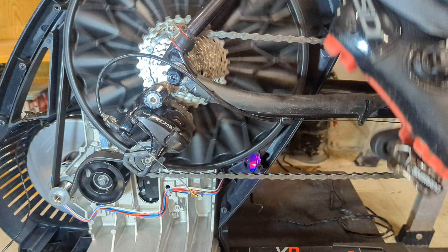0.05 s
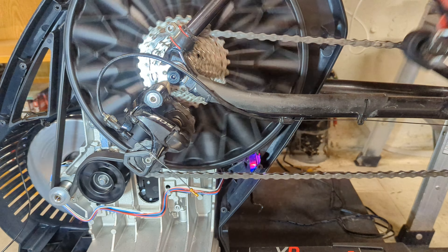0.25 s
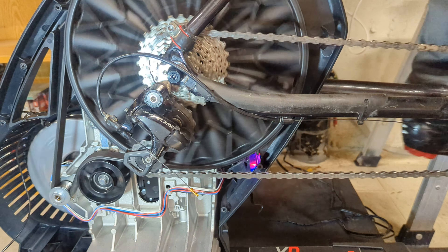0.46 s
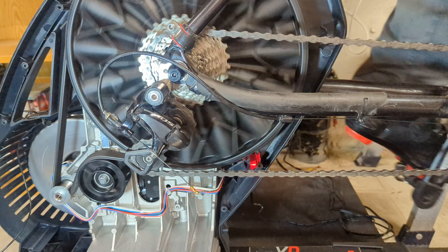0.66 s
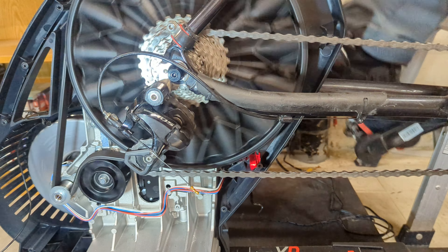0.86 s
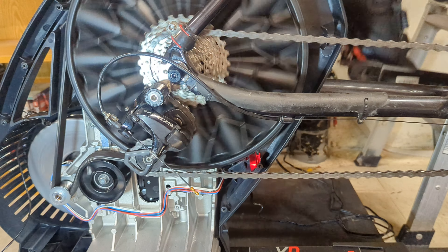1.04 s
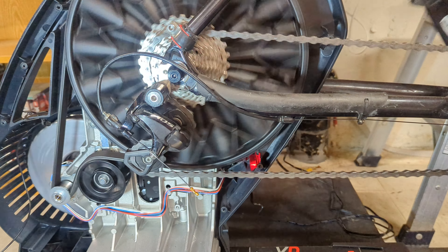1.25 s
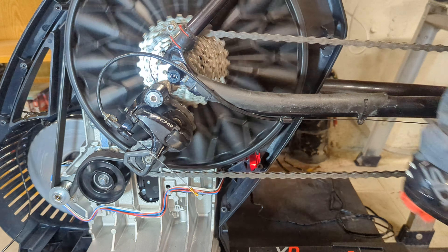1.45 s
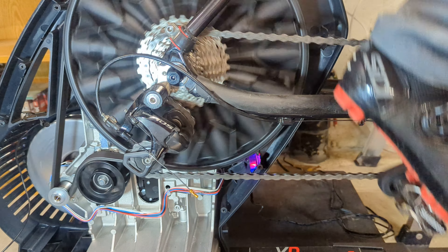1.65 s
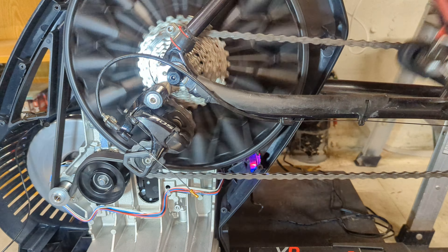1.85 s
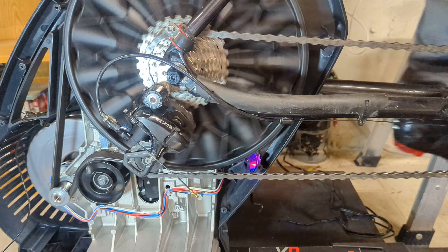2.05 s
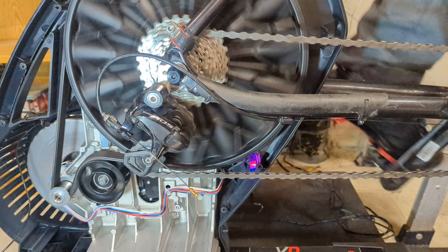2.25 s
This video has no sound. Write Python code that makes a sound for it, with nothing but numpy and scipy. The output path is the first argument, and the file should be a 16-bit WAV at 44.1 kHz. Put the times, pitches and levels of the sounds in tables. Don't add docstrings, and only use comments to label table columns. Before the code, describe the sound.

Direct-drive bike trainer running steadily indoors, belt and chain grinding, cracking sharply twice amid soft knocks

```python
import sys
import numpy as np
from scipy import signal
from scipy.io import wavfile

SR = 44100
rng = np.random.default_rng(int(sys.argv[2]) if len(sys.argv) > 2 else 0)


def transcribe(signal):
    frames = np.atleast_2d(signal).T
    limited = np.clip(frames, -1, 1)
    pcm = np.round(limited * 32767).astype(np.int16)
    wavfile.write(sys.argv[1], SR, pcm)


def how_loud(loudness_db):
    steps = np.asarray(loudness_db, float) / 20
    return 10 ** steps


N = 103635
TIME = np.arange(N) / SR

# push_s, crack_s
BANG_TIMES = [
    (.2352, .2392),
    (1.2959, 1.3040),
]


def rms_one(x):
    return x / np.sqrt(np.mean(x ** 2) + 1e-20)


def at_hz(points, hz):
    table_hz, value = np.array(points)[:, :2].T
    return np.interp(np.log(hz), np.log(table_hz), value)


def drift(rate_hz):
    r = np.exp(-80 * np.pi * rate_hz / SR)
    white = rng.standard_normal(N // 40 + 2002)
    slow = signal.lfilter([1], [1, -2 * r, r * r], white)[2000:]
    return np.interp(np.arange(N) / 40, np.arange(len(slow)), rms_one(slow))


def ring(clicks, hz, t60_s):
    r, w = how_loud(-60 / (t60_s * SR)), 2 * np.pi * hz / SR
    return signal.lfilter([0, np.sin(w)], [1, -2 * r * np.cos(w), r * r], clicks + 1e-18)


def bandpass(x, edges_hz):
    return signal.sosfilt(signal.butter(2, edges_hz, "band", fs=SR, output="sos"), x)


def bands(spectrum, size=N):
    edges_hz = 24 * 2 ** (np.arange(26) / 3)
    white = rng.standard_normal((2, size))
    centre_hz = np.sqrt(edges_hz[1:] * edges_hz[:-1])
    out = np.array([how_loud(at_hz(spectrum, hz)) * bandpass(white[k % 2], edges_hz[k:k + 2])
                    for k, hz in enumerate(centre_hz)])
    return zip(centre_hz, out / out.sum(0).std())


def add(out, s, piece):
    i = max(int(s * SR), 0)
    out[i:i + len(piece)] += piece[:N - i]


def grind():
    # start_s, level_db, upper_bright_db, belt_whine_db (near 1 kHz)
    effort = [(0, -44, -5.5, 12.5), (0.058, -48, -8, 1.5), (.16, -52.5, 0, 8), (0.231, -48, -1.5, 0.5),
              (0.451, -51.5, -0.1, -0.5), (.66, -49, -2.1, 3.5), (.85, -49.5, -0.6, 0),
              (1.15, -49.5, 0, 5.5), (1.291, -49.5, 1, 2), (1.412, -51.5, 0.5, 1.5),
              (1.43, -47.5, 7.5, -6.5), (1.479, -48.5, -0.6, 2.5), (1.951, -47.5, 1.5, -1),
              (2.35, -48.5, 1.9, -0.9)]
    # freq_hz, density_db_per_hz
    hiss_spectrum = [(25, -16), (55, -14), (85, -22.5), (400, -12.5), (1050, -2.5), (2100, -15),
                     (3200, -25.5), (6600, -45.5)]
    # freq_hz, width_hz, level_db
    housing = [(59, 5.6, -18), (146, 18, -10), (270, 69, -3), (443.4, 22, -7.5), (577.8, 14, -10),
               (682.5, 33, -4.5), (809, 50, -4), (1005, 102, -1.2), (1094, 110, -3), (1192, 36, -10.5),
               (1306, 32, -4), (1420, 99, -1.5), (1755, 170, -6), (2600, 130, -11)]
    teeth_per_s, teeth_spread_db, teeth_db, hiss_db = 8000, 2.5, -1, -2.5

    level_db, bright_db, whine_db = [np.interp(TIME, effort_s, column) for effort_s, column in
                                     zip([np.array(effort)[:, 0]] * 3, np.array(effort).T[1:])]
    together = drift(45)
    hiss = 0
    for hz, x in bands(hiss_spectrum):
        hiss = hiss + x[::-1] * how_loud(bright_db * (hz > 1600) + 0.9 * together + 1.3 * drift(28))
    teeth = 0
    for hz, width_hz, db in housing:
        met = rng.random(N) < teeth_per_s / len(housing) * how_loud(0.8 * together) / SR
        sizes = how_loud(teeth_spread_db * np.minimum(rng.exponential(1, N), 4)) * rng.choice([-1, 1], N)
        t60_s = 1.78 / width_hz
        mode = rms_one(ring(ring(met * sizes, hz, t60_s), hz, t60_s))[::-1]
        mode_db = db + 1.1 * drift(10) + (900 < hz < 1150) * whine_db + (hz > 1300) * bright_db
        teeth = teeth + how_loud(mode_db) * mode
    return how_loud(level_db) * (how_loud(hiss_db) * hiss + how_loud(teeth_db) * rms_one(teeth))


def hum():
    # centre_s, peak_db, half_length_s, pitch_hz
    swells = [(.02, -43, .022, 264.3), (1.644, -49, .018, 290), (.39, -48, 0.032, 149),
              (.54, -57, 0.066, 145.7), (.87, -49.5, 0.031, 151), (1.13, -59, 0.027, 145),
              (1.26, -51.5, 0.019, 146), (1.63, -57, 0.021, 145), (1.84, -55, 0.038, 150.7),
              (1.975, -48, .03, 140.6), (2.055, -51, 0.035, 135), (2.18, -48.5, 0.024, 145),
              (2.315, -50, 0.025, 149.7)]
    out = np.zeros(N)
    for s, db, half_s, hz in swells:
        t = TIME - s
        out += how_loud(db) * np.sqrt(2) * np.exp(-(t / half_s) ** 2) * np.sin(2 * np.pi * hz * t)
    return out


def knocks():
    # start_s, peak_db, sharpness_db
    opening = (0.0014, -36.5, 0.5)
    # start_s, peak_db, sharpness_db
    later = [(0.048, -34, -10), (0.324, -44, 3.5), (0.344, -37, -0.5), (0.518, -27, -15),
             (1.002, -31, -4.5), (1.445, -34.5, 4), (1.626, -40.5, -9), (1.828, -29, -9.5),
             (1.844, -34.5, -26), (1.87, -33.5, -11), (1.885, -40, 0.5), (2.035, -28.5, -8),
             (2.051, -30, -9.5), (2.216, -34, -10), (2.239, -38, -0.5)]
    # freq_hz, level_db, t60_s
    frame = [
        (247, -5, 0.082),
        (341, -0.5, 0.019),
        (283, -7, 0.17),
        (470, -12, 0.081),
        (721, -7, 0.066),
        (1000, -4, 0.039),
        (1370, -14, 0.065),
        (56.5, -12.5, 0.2),
        (103, -11, 0.19),
    ]
    cut_hz, low_hz, thud_low_hz, thud_db = 405, 174, 30, -15

    s, db, sharp_db = np.transpose([opening] + list(later))
    out, chance = 0, rng.normal(0, 1, (len(s), len(frame), 2))
    for k, (hz, mode_db, t60_s) in enumerate(frame):
        upper = hz > 400
        late_s = upper * 0.0026 * np.abs(chance[:, k, 1])
        blow_db = db + mode_db + 1.8 * chance[:, k, 0] + sharp_db * upper + thud_db * (hz < 150)
        blows = np.zeros(N)
        blows[((s + late_s) * SR).astype(int)] = (-1) ** k * how_loud(blow_db)
        edges_hz = [low_hz if hz > 150 else thud_low_hz, cut_hz * (4 if upper else 1)]
        out = out + bandpass(ring(blows, hz, t60_s), edges_hz)
    return out


def chirrups():
    # start_s, peak_db, pitch_hz
    strong = [
        (0.01, -46, 990),
        (0.12, -35.5, 1000),
        (0.178, -28.5, 1094),
        (0.199, -31.5, 995),
        (1.155, -31.5, 1035),
        (1.17, -35.5, 1100),
        (1.239, -33.5, 1140),
        (1.872, -40.5, 900),
        (2.043, -34.5, 1420),
    ]
    # start_s, peak_db, pitch_hz
    faint = [(0.029, -38, 950), (0.542, -40.5, 1320), (0.579, -42, 1320), (0.647, -39.5, 980),
             (0.679, -35, 972), (0.699, -41, 840), (1.085, -39, 1160), (1.118, -35, 1310),
             (1.209, -35, 1080), (1.418, -37, 1410), (1.629, -38, 1360), (1.71, -39, 1020),
             (1.768, -36, 1420), (1.825, -36.5, 1406), (1.889, -34, 776), (1.961, -33, 1410),
             (1.991, -39, 1004), (2.099, -42.5, 1030), (2.175, -38, 1230), (2.236, -36, 996),
             (2.286, -40, 1310)]
    rise_s, fall_s, level_db, faint_db = 0.0042, 0.0016, -2, -3

    out, t = np.zeros(N), TIME[:SR // 20] - .011
    shape = np.exp(-(t / np.where(t < 0, rise_s, fall_s)) ** 2)
    for s, db, hz in list(strong) + [(s, db + faint_db, hz) for s, db, hz in faint]:
        add(out, s - .008, how_loud(db + level_db) * shape * np.sin(2 * np.pi * hz * t))
    return out


def ticks():
    # peak_s, peak_db, ring_hz
    rollers = [(0.091, -64.5, 3310), (0.1012, -56, 3680), (0.1385, -51, 4640), (0.1855, -59, 4080),
               (0.2022, -54, 4330), (0.344, -55.5, 3360), (0.3913, -55.5, 4190), (0.399, -53, 4620),
               (0.4302, -59.5, 4640), (0.4574, -61, 4200), (0.467, -58, 3730), (0.542, -59, 5080),
               (0.614, -66, 3590), (0.642, -61, 4030), (0.7351, -52, 4210), (0.7496, -61.5, 3370),
               (0.7706, -53.5, 5090), (0.828, -54.5, 3670), (0.8414, -59, 3990), (0.8838, -65, 3600),
               (0.9966, -64, 3710), (1.052, -59.5, 3350), (1.0779, -65, 3500), (1.1068, -60.5, 3740),
               (1.1214, -55.5, 4620), (1.171, -55, 3320), (1.2086, -61.5, 3530), (1.264, -63.5, 4160),
               (1.467, -51.5, 4230), (1.494, -56, 4660), (1.5293, -48, 4610), (1.5623, -61, 3380),
               (1.5853, -54, 4200), (1.6228, -62.5, 3700), (1.6572, -62, 3630), (1.709, -63, 3380),
               (1.7535, -59.5, 3710), (1.7988, -60.5, 3670), (1.831, -58, 4160), (1.8852, -62.5, 3720),
               (1.922, -62, 3560), (2.068, -56.5, 3340), (2.1277, -53.5, 4180), (2.169, -56.5, 3490),
               (2.21, -60, 4020), (2.225, -52.5, 4490), (2.2548, -58, 3480), (2.3123, -56.5, 4100)]
    puff_s, puff_db, ring_s, ring_db = 0.002, -8.5, .006, -20
    faint_per_s, faint_db = 65, -86.5

    bright = rms_one(bandpass(rng.standard_normal(N), [3000, 7400]))
    out, t = np.zeros(N), TIME[:SR // 20] / puff_s
    shape = t * np.exp(1 - t)
    for s, db, hz in rollers:
        puff = shape * np.roll(bright, -int(s * SR))[:len(t)]
        tick = how_loud(puff_db) * puff + how_loud(ring_db) * ring(0.16 * puff, hz, ring_s)
        add(out, s - .002, how_loud(db) * tick)
    faint = (rng.random(N) < faint_per_s / SR) * how_loud(faint_db + rng.normal(0, 1.1, N))
    return out + bright * signal.fftconvolve(faint, shape)[:N]


def bangs():
    # body_db, crack_db, tail_db, first_touch_db
    strengths = [
        (-20.5, -19, -25, -17),
        (-23, -14, -28.5, -26),
    ]
    # onset_spread_s, rise_s, t60_s, rebound_delay_s, rebound_db
    courses = [
        (0.00504, .0015, 0.04, 0.013, -11),
        (.001, 0.0023, 0.013, 0.0072, -5.5),
    ]
    # freq_hz, level_db, t60_s
    bodies = [
        [(39.5, -21.5, 0.53), (100, -16.5, 0.49), (145, -7.5, 0.22), (276, -2.5, 0.18), (420, -4.5, 0.1),
         (467, -21.5, 0.18), (564, -18.5, 0.31), (820, -2, 0.044), (1262, 2, 0.037), (1420, -3, 0.034),
         (1737, -17.5, 0.073), (2315, -10, 0.07), (2420, -6, 0.022), (2640, 0, 0.0093)],
        [(38.3, -17, 0.29), (90, -21, 0.31), (145, -19, 0.16), (206, -7, 0.16), (276, 2.5, 0.15),
         (421, -14, 0.14), (604, -11.5, 0.17), (679, -6.5, 0.074), (940, -4, 0.067), (1330, -11.5, .03),
         (2348, 4.5, 0.016), (2900, 4, 0.0063), (3285, -4, 0.016), (3940, -4, 0.021), (5600, -10, 0.016)],
    ]
    # freq_hz, density_db_per_hz
    bursts = [
        [(300, -16.5), (1340, 1.7), (2400, -10.5), (3200, -9), (7000, -27)],
        [(300, -2), (1660, -29), (2300, -2), (3800, -8.5), (5700, -15), (7000, -33.5)],
    ]
    # freq_hz, density_db_per_hz
    tails = [
        [(40, -10.5), (290, -5), (500, -4.5), (1200, -11), (2000, -15.5), (2400, -14.5), (7000, -43.5)],
        [(40, -0.5), (290, -7), (600, -6), (1200, -13.5), (3500, -16.5), (7000, -30.5)],
    ]
    # freq_hz, t60_s
    room = [
        (60, 0.33),
        (250, 0.33),
        (1000, 0.24),
        (3000, 0.26),
        (6000, 0.23),
    ]
    split_hz, tail_rise_s, push_s, prelude_s, prelude_db = 360, 0.00291, 0.002, 0.00439, -11
    scrape_db, scrape_lead_s, mode_rebound_db = -22.5, .0042, -8

    out, t = np.zeros(N), TIME[:SR // 2]
    click = 1. * (t == 0)
    soft = np.sin(np.pi * np.minimum(t / push_s, 1)) ** 2
    soft = how_loud(prelude_db) * soft + np.roll(soft, int(prelude_s * SR))
    for times, strength, course, body, burst, tail in zip(BANG_TIMES, strengths, courses, bodies, bursts, tails):
        push, crack = times
        body_db, crack_db, tail_db, touch_db = strength
        spread_s, rise_s, crack_t60_s, again_s, again_db = course
        for hz, db, t60_s in body:
            late_s, mode_db = spread_s * rng.random(), body_db + db
            if hz < split_hz:
                add(out, push, -how_loud(mode_db) * ring(soft * 1.43 / soft.sum(), hz, t60_s))
            else:
                blow = ring(0.13 * click, hz, 0.0037)
                add(out, crack + late_s * min(1, 1500 / hz), how_loud(mode_db) * ring(blow, hz, t60_s))
                rebound = how_loud(mode_db + again_db + mode_rebound_db) * ring(click, hz, t60_s)
                add(out, crack + again_s + late_s, rebound)
        snap = how_loud(crack_db - 60 * t / crack_t60_s) * (1 - np.exp(-t / rise_s))
        snap = snap * sum(x for hz, x in bands(burst, size=len(t)))
        touch = ring(ring(0.057 * click, 810, 0.011), 810, 0.011)
        add(out, push + .0015, how_loud(touch_db) * touch)
        add(out, crack - scrape_lead_s, how_loud(scrape_db) * snap)
        add(out, crack, snap)
        add(out, crack + again_s, -how_loud(again_db) * snap)
        answer = sum(x * how_loud(tail_db - 60 * t / at_hz(room, hz) + 1.6 * drift(35)[:len(t)])
                     for hz, x in bands(tail, size=len(t)))
        add(out, crack, (1 - np.exp(-t / tail_rise_s)) * answer)
    return out


def scene():
    duck_db, duck_s = -1, 0.25
    duck = sum(duck_db * (TIME > s) * np.exp(-np.maximum(TIME - s, 0) / duck_s) for _, s in BANG_TIMES)
    return (grind() * how_loud(duck) + hum() + knocks() + chirrups() + ticks() + bangs())[None]


def top_cut(x):
    return signal.sosfilt(signal.butter(12, 7280, fs=SR, output="sos"), x)


def record(dry):
    run_in, fade_s, cutoff_hz, noise_db = 600, .0015, 7755, -101
    led = np.concatenate([2 * dry[:, :1] - dry[:, run_in:0:-1], dry], axis=1)
    low_pass = signal.cheby2(12, 55, cutoff_hz, fs=SR, output="sos")
    x = signal.sosfilt(low_pass, led)[:, run_in:] * np.minimum(TIME[::-1] / fade_s, 1)
    return top_cut(x + how_loud(noise_db) * rng.standard_normal(dry.shape))


dry = scene()
out = record(dry)
transcribe(out)
```